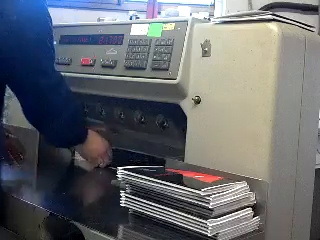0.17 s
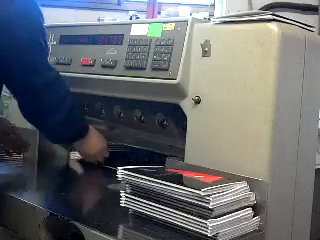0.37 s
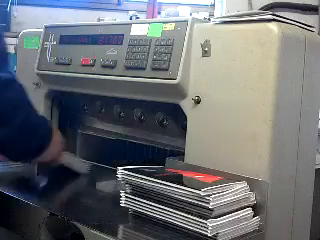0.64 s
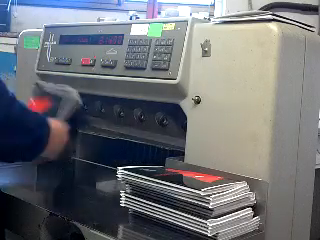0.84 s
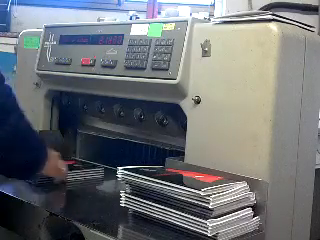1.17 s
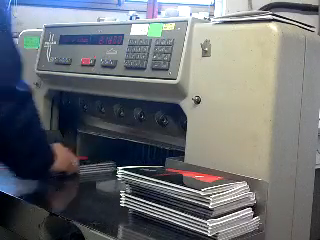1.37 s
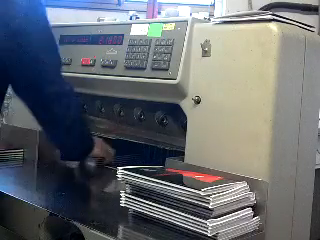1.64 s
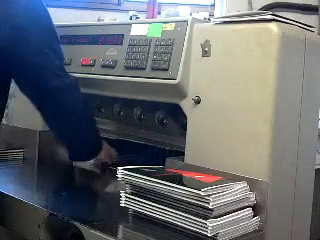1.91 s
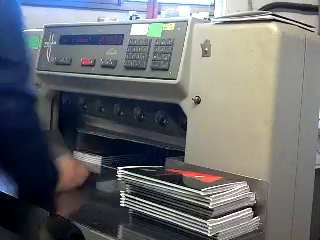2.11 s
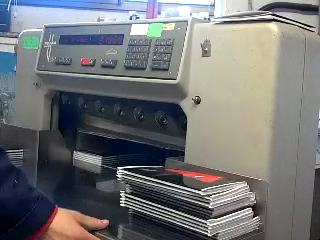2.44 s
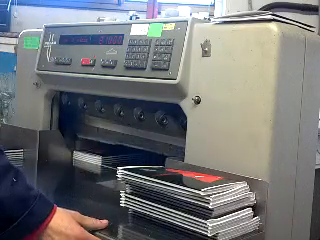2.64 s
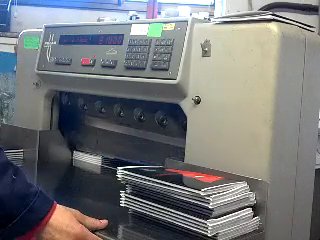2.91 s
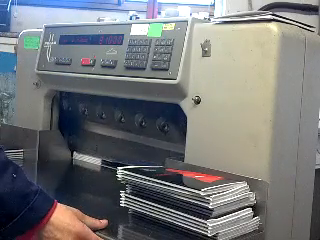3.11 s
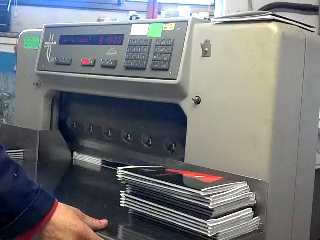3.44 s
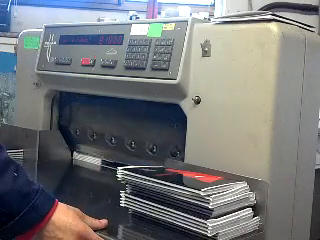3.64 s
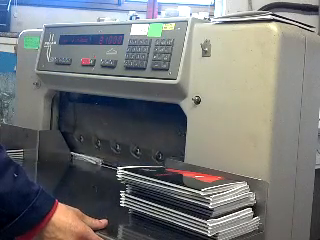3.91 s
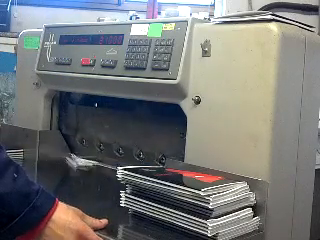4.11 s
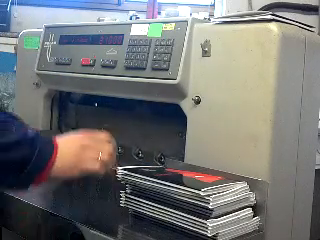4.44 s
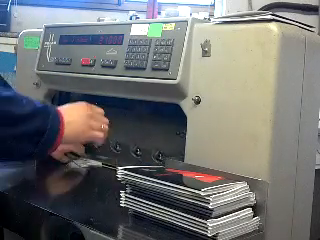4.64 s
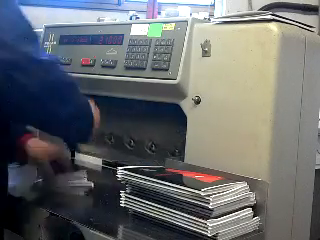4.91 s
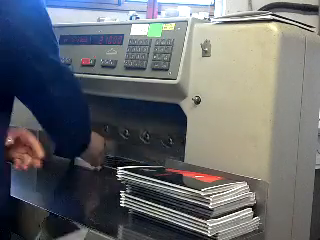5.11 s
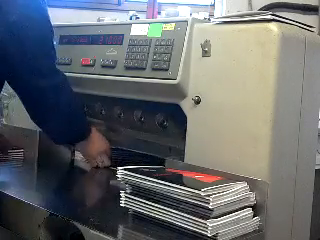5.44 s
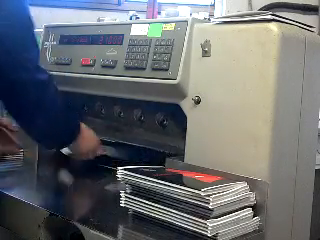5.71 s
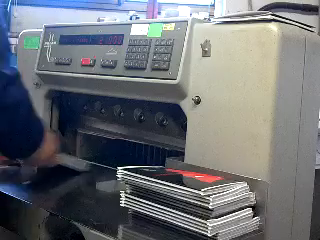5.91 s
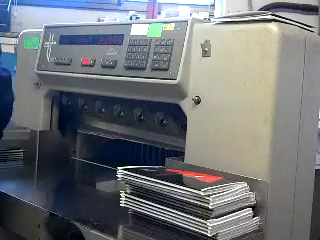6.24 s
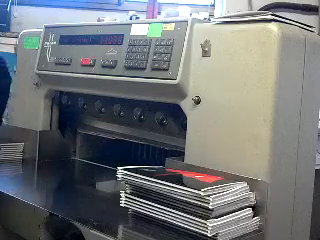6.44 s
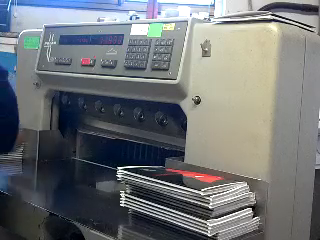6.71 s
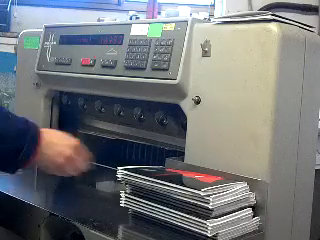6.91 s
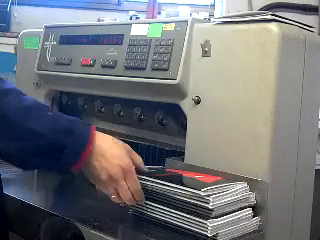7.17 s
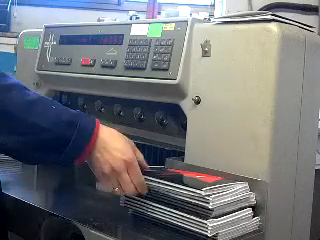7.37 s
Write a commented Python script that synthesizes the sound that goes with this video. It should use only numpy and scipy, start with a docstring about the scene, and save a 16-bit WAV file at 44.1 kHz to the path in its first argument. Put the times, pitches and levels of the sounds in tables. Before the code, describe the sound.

Close beside a paper guillotine, over a faint workshop hum, paper scrapes softly on a steel table, with sharp snaps near 0.6 and 1.05 seconds. Booklets are knocked square with hollow, slightly ringing blows at about 1.6 and 1.7 seconds. At 2.5 comes a thump and a hard knock, and a hydraulic pump hums for half a second. The clutch clunks at 3 seconds and gears whine, rising slightly, as the blade hisses down and crunches through the sheets around 3.8 to 4. The stroke ends with a click and thud at 4.1 and a light metallic ring at 4.3. Another knock lands at 4.9, followed by soft paper scrapes and ticks. At 6.1 a motor climbs to a high, rattling whine, then brakes with a short, loud squeal at 6.7. After a small bump, it whines up again from 7.2 to the end.

```python
"""Paper slides over steel, then booklets are knocked square on the table of a print shop guillotine.
The hydraulic pump sings as the clamp comes down, the clutch engages and the geared knife crunches
through the sheets. Then the back gauge motor whines up to speed, brakes, and starts again.
Heard from beside the machine, on a small camera's microphone with a widened stereo image;
steel panels answer from close by, with the workshop and its idle hum behind."""
import sys
import numpy as np
from scipy import signal
from scipy.fft import rfft, irfft, next_fast_len
from scipy.io import wavfile
from scipy.ndimage import map_coordinates

SR = 44100
rng = np.random.default_rng(int(sys.argv[2]) if len(sys.argv) > 2 else 0)


def master(y):
    """Save y as 16-bit WAV."""
    cut = np.clip(np.atleast_2d(y).T, -1, 1)
    pcm = np.round(cut * 32767)  # scale
    wavfile.write(sys.argv[1], SR, pcm.astype(np.int16))


N = 332955
CLUTCH_IN_S, CLUTCH_OUT_S = 3.0, 4.091  # one stroke of the knife

# The blade breaking through bundles of sheets: start_s, length_s, level_db (all levels are relative)
BITES = [(3.756, 0.034, -34), (3.819, 0.017, -30), (3.98, 0.02, -35)]
# Spectrum of paper under the blade: frequency_hz, level_db
CUT_SPECTRUM = [(110, -20), (160, -16), (250, 3), (400, 6.5), (700, -14), (1100, -28), (1700, -4),
                (2600, -12), (4000, -20.5), (6500, -17), (10000, -25)]
def blade():
    """The blade rubs and hisses down through the stack; breaking fibres make it crunch."""
    rubbing = amp(-37.5) * held(CLUTCH_IN_S, CLUTCH_OUT_S, attack=1.0, t60=0.66)
    biting = sum(amp(db) * held(s, s + length, attack=0.014, t60=0.11) for s, length, db in BITES)
    fibres = unit(amp(4.4 * wobble(300) + 3.9 * wobble(35)))
    rub = rubbing * noise(CUT_SPECTRUM, bass_db=6.5, treble_db=5.5)
    bites = biting * noise(CUT_SPECTRUM, bass_db=4.5, treble_db=10)
    hiss = amp(-50 + 4.2 * wobble(8)) * noise(SWISH_SPECTRUM)
    return fibres * (rub + bites) + hiss * held(CLUTCH_IN_S, CLUTCH_OUT_S, attack=0.15, t60=0.43)


# The gears through one stroke: time_s, tooth_rate_hz, whine_db
GEAR_RUN = [(3.06, 208, -35.5), (3.18, 226, -34.5), (3.28, 259, -32), (3.37, 268, -36.5),
            (3.68, 276, -36.5), (4.08, 271, -43), (4.3, 215, -47)]
# Partials of the meshing teeth: tooth_rate_multiple, level_db
TOOTH_PARTIALS = [(1, -13), (2, -8), (3, 0), (4, -11), (5, -17)]
# Partials of the bearings: tooth_rate_multiple, level_db
BEARING_PARTIALS = [(4, -1), (5, -4), (13, -9), (14, -10), (15, -7), (16, -4), (17, -10)]
# The gear case straining as the speed changes: start_s, stop_s, level_db
GROANS = [(3.05, 3.217, -31), (4.094, 4.185, -39)]
# Spectrum of the rush in the gearbox, and of the pump's oil: frequency_hz, level_db
RUSH_SPECTRUM = [(110, -25.5), (160, -3), (250, -7.5), (400, -12.5), (700, -1), (1100, -4.5), (1700, -11),
                 (4000, -14), (6500, -28.5), (10000, -17)]
def gears(case_hz=690):
    """The knife's gears run up and down: teeth whine, bearings sing near full speed, the case groans."""
    times, rates, levels = np.transpose(GEAR_RUN)
    t = np.arange(N) / SR
    tooth_hz, whine_db = np.interp(t, times, rates), np.interp(t, times, levels)
    wavering_hz = tooth_hz * (1 + 0.004 * wobble(14))
    whine = amp(whine_db + 2.3 * wobble(18)) * tones(wavering_hz, TOOTH_PARTIALS, flutter=0.82, rate=60)
    whine *= held(CLUTCH_IN_S, CLUTCH_OUT_S, attack=0.028, t60=0.4)
    singing = amp(-44.5) * tones(wavering_hz, BEARING_PARTIALS, flutter=0.55)
    singing *= held(3.29, CLUTCH_OUT_S - 0.26, attack=0.2, t60=1)
    strain = sum(amp(db) * held(start, stop, attack=0.037, t60=0.55) for start, stop, db in GROANS)
    groan = strain * tones(np.full(N, case_hz), [(1, 0)], flutter=0.89, rate=70)
    meshing = 1 + 0.15 * np.sin(2 * np.pi * np.cumsum(tooth_hz) / SR)
    rush = amp(-35.5) * meshing * noise(RUSH_SPECTRUM)
    rush *= held(CLUTCH_IN_S, CLUTCH_OUT_S, attack=0.19, t60=0.46)
    return whine + singing + groan + rush


# Modes of the knife beam: pitch_hz, level_db, t60_s
BEAM_MODES = [(351, -31, 0.6), (488, -30, 0.52), (870, -24, 0.21)]
def knife_beam(stop_s=4.341):
    """The beam rings as it stops after the cut."""
    track = np.zeros(N)
    add(track, stop_s, ring(BEAM_MODES, attack=0.0027, drift=0.8))
    return track


# The pump pressing the clamp, then backing the cut: start_s, stop_s, level_db
PUMP_LOADS = [(2.568, 3.067, -37), (3.8, 4.103, -42.5)]
# Partials of the pump: harmonic_number, level_db
PUMP_PARTIALS = [(1, 0), (2, -1.5), (3, -8), (4, -13), (6, -18), (7, -20), (12, -22), (15, -25)]
def pump(pitch_hz=295):
    """The hydraulic pump sings over rushing oil whenever it is under load."""
    load = sum(amp(db) * held(start, stop, attack=0.069, t60=0.58) for start, stop, db in PUMP_LOADS)
    song = tones(pitch_hz * (1 + 0.002 * wobble(8)), PUMP_PARTIALS, flutter=0.42)
    oil = amp(-6.5) * noise(RUSH_SPECTRUM, bass_db=11, treble_db=-1.5)
    return load * (song + oil)


# Moves of the back gauge: start_s, run_up_s, brake_s, full_speed_hz, screw_db
GAUGE_MOVES = [(6.094, .345, 6.669, 1583, -29.5), (7.205, .31, 7.8, 1636, -29)]
# Resonances of the motor mount, swept by the motor's tone: centre_hz, width_hz, gain_db
MOUNT_RESONANCES = [(1363, 71, 14), (1640, 22, 13)]
# Spectrum of the lead screw's rattle: frequency_hz, level_db
SCREW_SPECTRUM = [(110, -9), (160, -5.5), (250, -3.5), (400, -3), (1100, -4), (1700, -13), (2600, -20),
                  (4000, -23), (6500, -29), (10000, -38.5)]
# Shaft, belt and bearing tones: shaft_rate_multiple, level_db
SHAFT_PARTIALS = [(1, -3), (1.699, 0.5), (2.8, 0), (4.449, 2.5), (7.5, -11)]
# Modes of the braked carriage: pitch_hz, level_db, t60_s
CARRIAGE_MODES = [(153, -49, 2.2), (215, -46, 2.2), (350, -51, 2.4), (745, -47, 1.1), (1017, -39, 1.5),
                  (1255, -53, 1.2)]
# Resonances of the guard panels: centre_hz, width_hz, gain_db
GUARD_RESONANCES = [(155, 12, 0), (203, 14, 7), (238, 22, 10), (480, 92, -11), (1040, 80, 2.5)]
def back_gauge(start_s, run_up_s, brake_s, full_speed_hz, screw_db, braking_s=0.16, squeal_s=0.064):
    """The motor's tone follows its speed and squeals on braking; the lead screw rattles the panels."""
    run_up = progress(start_s, run_up_s)
    speed = (1 - (1 - run_up) ** 2) * (1 - progress(brake_s, braking_s))
    motor_hz = full_speed_hz * speed
    running = amp(-43.5) * speed * np.abs(1 + resonances(MOUNT_RESONANCES, motor_hz))
    effort = amp(-34) * speed ** 1.5 * (1 - run_up ** 2)  # louder while speeding up
    whine = (running + effort) * tones(motor_hz, [(1, 0)], flutter=0.8, rate=130)
    braking = held(brake_s, brake_s + squeal_s, attack=0.022, t60=0.059)
    squeal = amp(-18) * tones(motor_hz, [(0.99, 0)], flutter=0.74, rate=260)
    scrape = amp(-35.5) * noise(SCREW_SPECTRUM, treble_db=12)
    rattle = unit(noise(SCREW_SPECTRUM, bass_db=-1, treble_db=1) * amp(2 * wobble(70)))
    shaft = amp(-8.5) * tones(motor_hz / 8, SHAFT_PARTIALS, flutter=0.64)
    screw = amp(screw_db) * speed ** 1.31 * (rattle + shaft)
    drive = whine + braking * (squeal + scrape) + screw
    guard = filtered(drive, lambda hz: resonances(GUARD_RESONANCES, hz))
    carriage = np.zeros(N)
    add(carriage, brake_s + squeal_s, ring(CARRIAGE_MODES, attack=0.0068, drift=0.7))
    return drive + guard + carriage * amp(2.6 * wobble(30))


# Blows on the table and frame:
# start_s, length_s, level_db, bass_db, treble_db, ring_db, hollow_hz, hollow_db, rap_hz, rap_db
KNOCKS = [(0.888, 0.024, -45, 1, -11, -9, 330, -6, 1025, 6.5),
          (1.0481, 0.0087, -23.5, 2, 5.5, -14.5, 326, -11.5, 680, -8),
          (1.255, 0.021, -30.5, -13, -0.5, -17, 448, -17, 994, 3),
          (1.571, 0.022, -17.5, -10.5, -6, -4.5, 408.6, -0.5, 1230, -3),
          (1.701, 0.035, -26, 2.5, 0.5, -3.5, 310, -4, 1080, -2.5),
          (2.166, 0.045, -49, -40, 6, 2, 340, -10, 1085, 4.5),
          (2.382, 0.028, -37, -47, 0.5, -22, 450, -16, 1120, 4.5),
          (2.551, 0.038, -18.5, -2, 4.5, -2, 291, -3, 620, -6),
          (2.999, 0.028, -20, -3, 1.5, 2, 286, 0, 1740, -3),
          (4.087, 0.031, -33.5, 1, -13, -5, 216.5, 9, 520, -6),
          (4.341, 0.029, -33.5, 7, -9, -3, 529, 5.5, 834, 0),
          (4.576, 0.021, -43.5, 13.5, 3.5, -0.5, 397, -1, 580, -5.5),
          (4.9271, 0.033, -26.5, -11, -6, -5.5, 303, -7, 1184, -1),
          (6.07, 0.03, -37, -1, 5.5, -11, 400, -4, 1465, -2.5)]
# Spectrum of a blow's clatter: frequency_hz, level_db
KNOCK_SPECTRUM = [(110, -16.5), (160, -14.5), (250, 4), (400, 0.5), (700, 1.5), (1100, -2.5), (1700, -2),
                  (2600, -8.5), (4000, -15), (6500, -21), (10000, -29.5)]
def knocks():
    """Each blow clatters briefly and rings both the whole table and the spot where it lands."""
    clatter = contacts(KNOCKS, KNOCK_SPECTRUM, attack=0.0018, t60=0.081, grain_db=1.5)
    return clatter + table_ring() + boom_and_rap()


# Modes of the steel table: pitch_hz, level_db, t60_s
TABLE_MODES = [(148.9, -21, 0.76), (209, -21, 0.68), (286.8, -3, 0.26), (329.6, -27, 2.6), (1046, -25, 1.1),
               (1814, -16, 0.34), (2006, -14.5, 0.21), (2520, -30, 0.25)]
def table_ring():
    """Every knock rings the steel table; a blow with little bass stirs its low modes less."""
    track = np.zeros(N)
    for s, length, db, bass_db, _, ring_db, *_ in KNOCKS:
        modes = [(hz, level + bass_db * (hz < 250), t60) for hz, level, t60 in TABLE_MODES]
        add(track, s, amp(db + ring_db) * ring(modes, attack=length / 2))
    return track


# Resonances that give a rap its bright edge: centre_hz, width_hz, gain_db
RAP_EDGE = [(3280, 213, -4.5), (3730, 460, -18.5)]
def boom_and_rap(boom_t60_s=0.23, rap_t60_s=0.2, rap_width_hz=110):
    """Where it lands, each blow wakes a hollow boom and a hard rap."""
    track, t = np.zeros(N), np.arange(SR // 2) / SR
    for s, length, db, *_, hollow_hz, hollow_db, rap_hz, rap_db in KNOCKS:
        add(track, s, amp(db + hollow_db) * ring([(hollow_hz, 0, boom_t60_s)], attack=length / 2))
        peaks = [(rap_hz, rap_width_hz, 0)] + RAP_EDGE
        rap = unit(filtered(rng.standard_normal(len(t)), lambda hz: resonances(peaks, hz)))
        add(track, s, rap * (1 - np.exp(-t / 0.0035)) * amp(db + rap_db - 60 * t / rap_t60_s))
    return track


# Pushes of stacks, clamp, knife and gauge, and at 1.3 s a low swell lingering after a knock: start_s, length_s,
# level_db, bass_db, treble_db
THUMPS = [(.69, 0.026, -43, 1, 0), (.79, 0.063, -35, 17, 4), (.935, 0.093, -47.5, 7, 3),
          (1.3, 0.04, -45, 21, 21), (1.551, 0.012, -39.5, -14, 5), (2.476, 0.086, -23.5, -11.5, 0.5),
          (3.03, 0.062, -26, 3.5, 6), (3.995, 0.095, -34, 1.5, 0), (4.095, 0.05, -27, 5.5, -1),
          (4.945, 0.029, -27.5, 5.5, 2), (5.905, 0.04, -41.5, -2.5, 7), (6.1, 0.053, -32.5, 12.5, 6),
          (6.365, 0.06, -26, -8.5, -0.5), (7.18, 0.017, -33.5, 16, 18.5)]
# Spectrum of a push: frequency_hz, level_db
THUMP_SPECTRUM = [(110, -16.5), (160, 3.5), (250, 1), (400, 4.5), (700, -2), (1100, -8), (1700, -15),
                  (2600, -24), (4000, -23.5), (6500, -34.5)]
def thumps():
    """Dull pushes, slower to rise and to fade than the clatter of a knock."""
    return contacts(THUMPS, THUMP_SPECTRUM, attack=0.0035, t60=0.17, grain_db=1.5)


# Scrapes across the table: start_s, length_s, level_db, bass_db, treble_db
SLIDES = [(0, 0.74, -53, 12, -6.5), (.028, 0.026, -42, -2, -2), (.063, 0.054, -34.5, -7, -0.5),
          (.536, 0.061, -41.5, -13, 5), (.66, 0.029, -46, -3, -2), (.759, 0.03, -34.5, 2, -6.5),
          (2.42, 0.064, -39.5, -1, -9.5), (5.21, 0.08, -43, 6, 1), (5.33, 0.1, -52.5, 14.5, -7.5),
          (5.733, 0.064, -48.5, 6, 0.5), (5.826, 0.018, -37.5, -12, -6.5), (5.975, 0.015, -40.5, 11, -6.5),
          (6.062, 0.025, -38.5, 8, -2.5), (7.148, 0.038, -37.5, 5, -4.5)]
# Spectrum of paper on steel: frequency_hz, level_db
PAPER_SPECTRUM = [(110, -13), (250, -0.5), (400, 1.5), (700, -3), (1100, -3.5), (1700, -5.5), (2600, -11.5),
                  (4000, -4), (6500, -7.5), (10000, -6.5)]
def slides():
    """Paper, and the gauge breaking free, scrape grainily on the steel."""
    return contacts(SLIDES, PAPER_SPECTRUM, attack=0.00061, t60=0.083, grain_db=2.5)


# Sheet edges snapping close to the microphone: start_s, level_db, t60_s
SNAPS = [(0.3895, -32, 0.012), (0.536, -30, 0.0098), (.568, -18.5, 0.031), (.69, -35, .015),
         (1.053, -14, 0.026), (1.0627, -13.5, 0.033), (2.391, -23, 0.017), (3.8333, -20, 0.014),
         (3.862, -25, 0.013), (3.99, -27.5, 0.027), (4.07, -14.5, 0.0074), (4.0822, -14, .009),
         (5.1886, -36, 0.026), (5.4342, -36, 0.007), (5.577, -40.5, 0.02), (5.7588, -34.5, 0.014),
         (5.831, -25.5, 0.028), (6.996, -42, 0.011)]
def paper_snaps(crack_t60_s=0.03):
    """Short bright snaps of paper edges, and the crack of each knock's first hard touch."""
    track, t = np.zeros(N), np.arange(SR // 20) / SR
    cracks = [(s, db + treble_db - 3, crack_t60_s) for s, _, db, _, treble_db, *_ in KNOCKS]
    for s, db, t60 in SNAPS + cracks:
        burst = noise(PAPER_SPECTRUM, len(t), bass_db=-17.5, treble_db=5)
        add(track, s, amp(db - 60 * t / t60) * burst)
    return track


# Glossy covers brushing and tearing: start_s, length_s, level_db
SWISHES = [(1.698, 0.023, -30.5), (3.813, 0.037, -33.5), (3.974, .02, -35), (5.827, 0.0072, -32.5),
           (6.39, 0.063, -45), (6.67, 0.032, -42)]
# Spectrum of a thin, high swish: frequency_hz, level_db
SWISH_SPECTRUM = [(2000, -50), (6500, -12), (9500, -1.5)]
def swishes():
    """Glossy paper slips in tiny jerks."""
    strokes = sum(amp(db) * held(s, s + length, attack=0.002, t60=0.041) for s, length, db in SWISHES)
    return strokes * unit(noise(SWISH_SPECTRUM) * amp(6 * wobble(250)))


def panel_echoes(x, t60=0.09):
    """Dense short reflections between the near steel panels reach the microphone from the sides."""
    t = np.arange(SR // 5) / SR
    echoes = rng.standard_normal(len(t)) * amp(-60 * t / t60) * (t > 0.002)  # nearest panel: 2 ms
    return np.array([[1], [-1]]) * signal.fftconvolve(x, echoes / np.linalg.norm(echoes))[:N]


# Decay of the workshop: frequency_hz, t60_s
ROOM_DECAY = [(100, 0.56), (260, 0.6), (700, 0.28), (1840, 0.34), (4850, 0.31), (10000, 0.18)]
def room(x):
    """The workshop's tail, unrelated left and right; each frequency dies at its own speed."""
    hz, t, spectra = signal.stft(rng.standard_normal((2, SR)), SR, nperseg=256)
    tail = signal.istft(spectra * amp(-60 * t / along(ROOM_DECAY, hz)[:, None]), SR, nperseg=256)[1]
    tail = np.pad(tail, ((0, 0), (200, 0)))  # arrives 4.5 ms after the direct sound
    return signal.fftconvolve(x[None], tail / np.linalg.norm(tail[0]), axes=1)[:, :N]


# Spectrum of the idle shop, all around the microphone: frequency_hz, level_db
HUM_SPECTRUM = [(110, -14.5), (160, -2.5), (250, -4), (400, 0.5), (700, -9), (1100, -12), (1700, -19.5),
                (2600, -21.5), (4000, -21), (6500, -27)]
def shop_hum():
    """Steady low noise, part in the centre and part separate on each side."""
    return noise(HUM_SPECTRUM) + np.array([noise(HUM_SPECTRUM), noise(HUM_SPECTRUM)])


def contacts(rows, spectrum, attack, t60, grain_db):
    """Each contact is a crowd of tiny impacts: grainy noise that lasts a moment and dies away."""
    track, t = np.zeros(N), np.arange(SR) / SR
    for s, length, db, bass_db, treble_db, *_ in rows:
        shape = (1 - np.exp(-t / attack)) * amp(db - 60 * np.maximum(t - length, 0) / t60)
        add(track, s, shape * noise(spectrum, len(t), bass_db, treble_db))
    return track * unit(amp(grain_db * wobble(500)))


def ring(modes, attack, drift=0.16):
    """Struck modes, each at a new strength; their phases drift (rad per 10 ms), blurring the pitch."""
    t = np.arange(2 * SR) / SR
    knots = t[::SR // 100]
    partials = np.zeros(len(t))
    for hz, db, t60 in modes:
        decay = amp(db + rng.normal(0, 3.8) - 60 * t / t60)
        phase = rng.uniform(0, 2 * np.pi)
        wander = np.interp(t, knots, np.cumsum(drift * rng.standard_normal(len(knots))))
        partials += decay * np.sin(2 * np.pi * hz * t + phase + wander)
    return partials * (1 - np.exp(-t / attack))


def tones(hz, partials, flutter, rate=45):
    """Partials of a turning part, each fluttering in strength and phase; rms 1."""
    turn = 2 * np.pi * np.cumsum(hz) / SR
    return unit(sum(amp(db + 3.7 * flutter * wobble(rate)) * np.sin(k * turn + flutter * wobble(rate))
                    for k, db in partials))


def noise(spectrum, size=N, bass_db=0, treble_db=0):
    """Noise of rms 1 with a spectrum and two shelves; the deep bass falls away."""
    shelves = [(60, bass_db - 25), (110, bass_db), (190, bass_db),
               (480, 0), (2200, 0), (4000, treble_db)]
    white = rng.standard_normal(size)
    return unit(filtered(white, lambda hz: amp(along(spectrum, hz) + along(shelves, hz))))


def resonances(rows, hz):
    """Complex response of resonances given as centre_hz, width_hz, gain_db."""
    return sum(amp(db) * 1j * hz * width / (centre ** 2 - hz ** 2 + 1j * hz * width)
               for centre, width, db in rows)


def filtered(x, response):
    """x times a complex response of frequency."""
    n = x.shape[-1]
    padded = next_fast_len(2 * n)
    return irfft(rfft(x, padded) * response(np.fft.rfftfreq(padded, 1 / SR)), padded)[..., :n]


def held(start, stop, attack, t60):
    """Envelope: rise, hold until stop, die away; times in seconds."""
    return progress(start, attack) * amp(-60 * np.maximum(np.arange(N) / SR - stop, 0) / t60)


def progress(start, length):
    """Rises evenly from 0 to 1 over length seconds."""
    return np.clip((np.arange(N) / SR - start) / length, 0, 1)


def wobble(rate):
    """A smooth random curve, rate knots a second."""
    return map_coordinates(rng.standard_normal(int(N * rate / SR) + 4), [np.arange(N) * rate / SR])


def along(points, hz):
    """Points of frequency_hz, value read on a log axis."""
    frequencies, values = np.transpose(points)
    return np.interp(np.log(hz + 1), np.log(frequencies + 1), values)


def add(track, s, sound):
    """Mix a sound in at time s."""
    part = track[round(s * SR):][:len(sound)]
    part += sound[:len(part)]


def amp(db):
    """Decibels to gain."""
    return 10 ** (np.asarray(db) / 20)


def unit(x):
    """Scale to rms 1."""
    return x / np.sqrt(np.mean(x ** 2) + 1e-20)


def scene():
    """Beside the guillotine: paper and machine up close, then the panels, the hum and the room."""
    table_work = knocks() + thumps() + slides()
    snaps = amp(-3) * paper_snaps()
    handling = amp(-0.5) * (table_work + swishes())
    cut = pump() + gears() + blade() + knife_beam()
    machine = amp(-2.5) * (cut + sum(back_gauge(*move) for move in GAUGE_MOVES))
    panels = amp(-1) * panel_echoes(handling + machine)
    into_room = amp(-4) * handling + amp(-5.5) * machine + amp(-14) * snaps  # small snaps hardly stir it
    return handling + machine + snaps + panels + amp(-59) * shop_hum() + room(into_room)


# The microphone's turn from mid towards side, below the comb: frequency_hz, angle_rad
STEREO_SPREAD = [(60, 0.76), (200, 0.54), (500, 0.52), (1000, 0.24), (1375, 0.031)]
# The camera's upper band limit: frequency_hz, gain_db
HIGH_CUT = [(10350, 0), (11000, -17), (12200, -42), (12600, -120)]
def record(dry, comb_period_hz=2756, low_cut_hz=79):
    """The camera's widener turns the treble from mid to side and back each comb period; band-limited."""
    def angle(hz):
        comb = np.pi * (hz / comb_period_hz - 0.5)
        return np.where(hz < comb_period_hz / 2, along(STEREO_SPREAD, hz), comb)

    def response(hz):
        bass_to_right = amp(along([(150, -1.9), (500, 0)], hz) * np.array([[1], [-1]]))
        low_cut = 1 / np.sqrt(1 + (low_cut_hz / (hz + 1)) ** 6)
        return bass_to_right * low_cut * amp(along(HIGH_CUT, hz))

    centre, across = (dry[0] + dry[1]) / 2, (dry[0] - dry[1]) / 2
    mid = filtered(centre, lambda hz: np.cos(angle(hz)))
    side = filtered(centre, lambda hz: 0.5j * np.sin(angle(hz)) * (hz > comb_period_hz / 2))
    side += filtered(across, lambda hz: np.sin(angle(hz)))
    return filtered(np.array([mid + side, mid - side]), response)


dry = scene()
out = record(dry)
master(out)
```